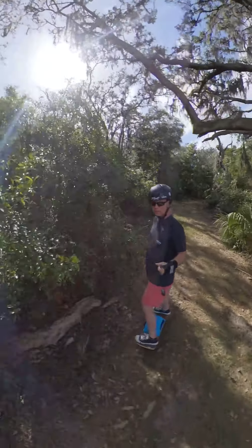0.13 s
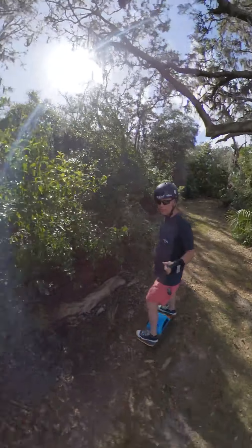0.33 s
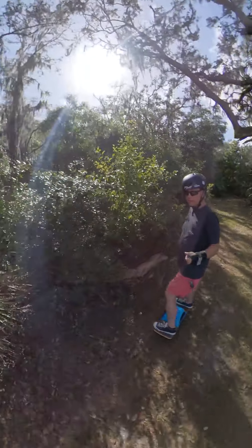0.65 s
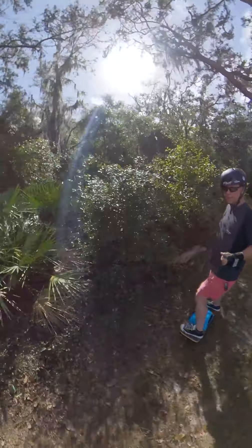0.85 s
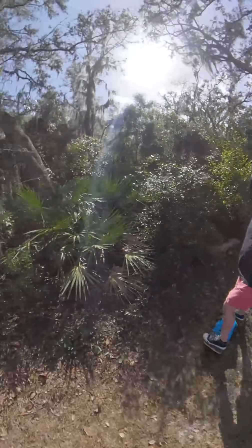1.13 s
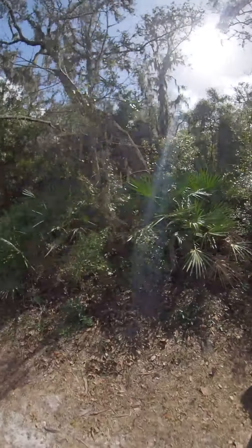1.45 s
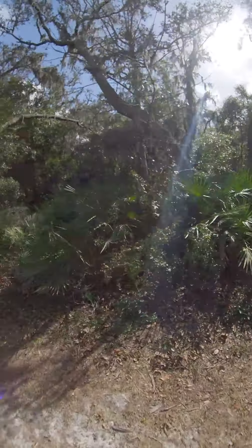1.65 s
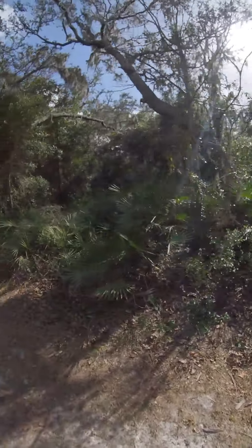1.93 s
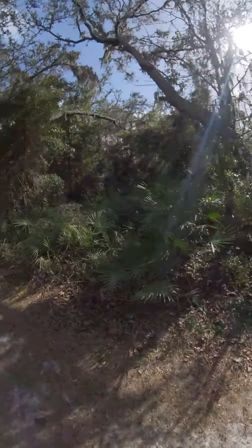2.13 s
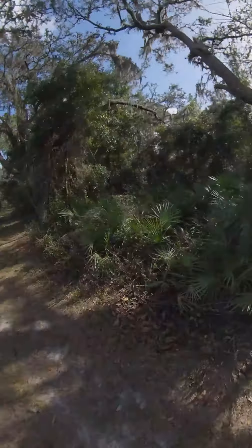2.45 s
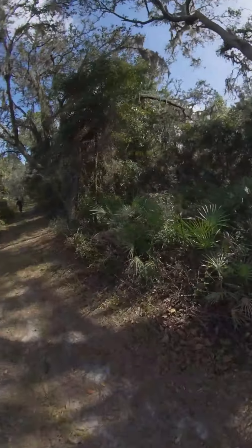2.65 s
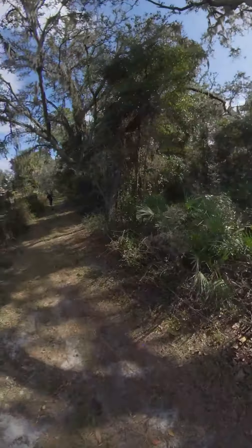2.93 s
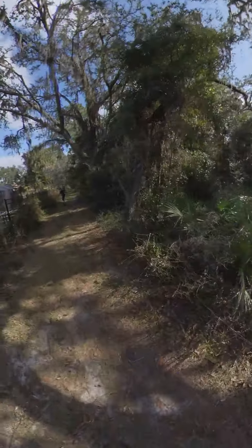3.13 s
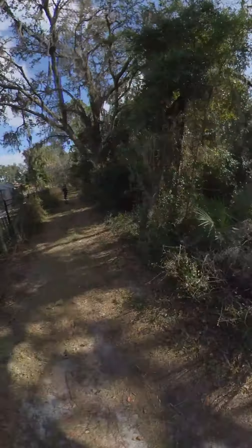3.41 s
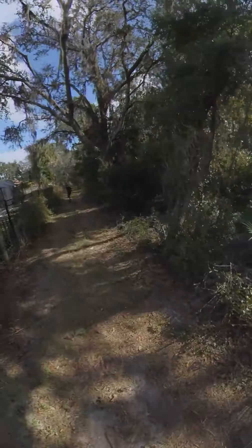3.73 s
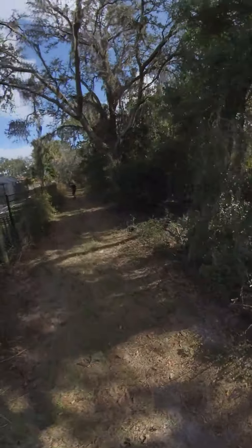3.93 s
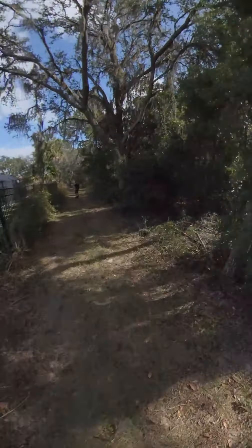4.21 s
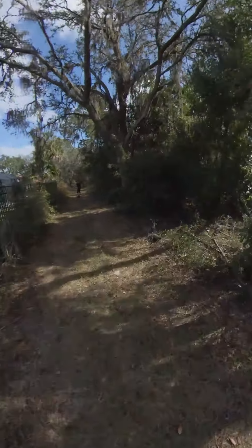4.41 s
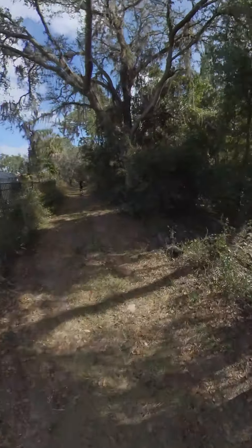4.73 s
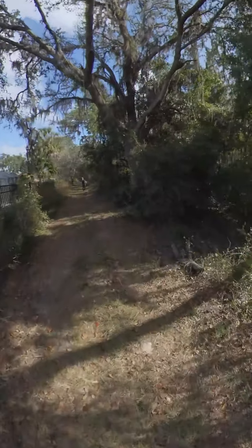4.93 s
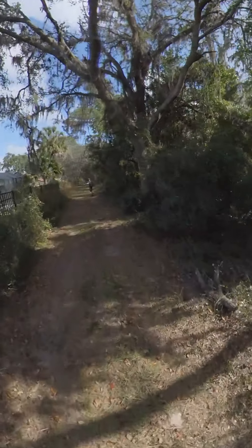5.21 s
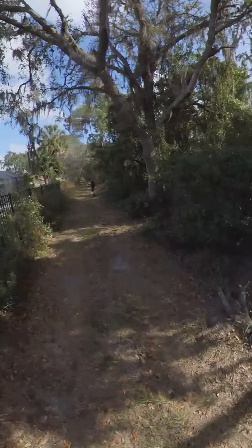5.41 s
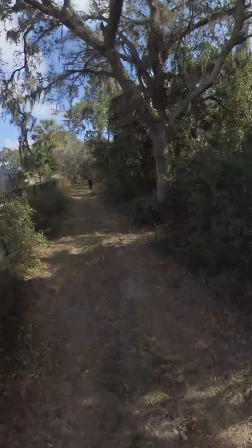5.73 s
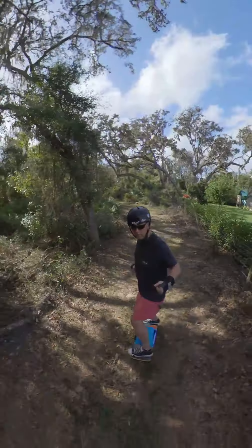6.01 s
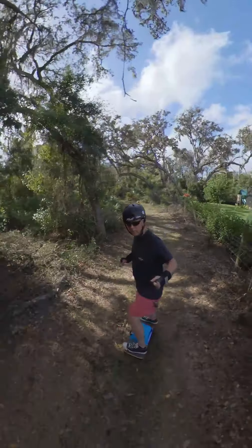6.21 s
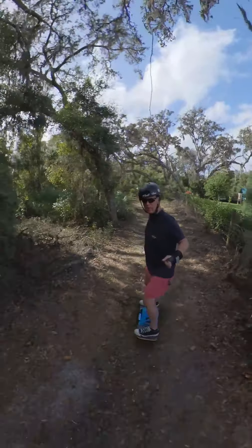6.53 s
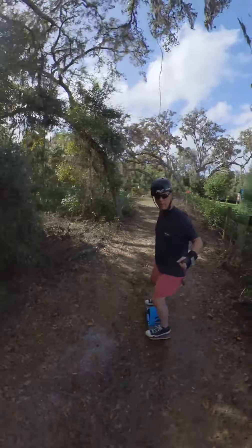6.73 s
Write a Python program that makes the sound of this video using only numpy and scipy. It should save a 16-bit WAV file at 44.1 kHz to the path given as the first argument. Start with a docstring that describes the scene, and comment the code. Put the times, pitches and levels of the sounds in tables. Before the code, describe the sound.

Low rough rolling on dirt, with crisp bursts of dry leaves, sharp twig clicks, dull deck knocks and soft wind buffeting.

```python
"""First comes the low, gritty rolling of a one-wheeled electric board on a dirt trail, over light wind.
A camera on a pole beside it hears the fat tyre crush dry leaves and snap twigs, and roots knock the deck.
Rolling and leaves are built from tiny random breaks; knocks are ringing tones and twigs are short clicks.
Wind is low noise that rises and falls on each port, with short thuds for puffs.
The wheel is nearer the right port."""
import sys
import numpy as np
from scipy import signal
from scipy.fft import rfft, irfft, next_fast_len
from scipy.io import wavfile
from scipy.ndimage import uniform_filter1d, map_coordinates

SR = 44100
rng = np.random.default_rng(int(sys.argv[2]) if len(sys.argv) > 2 else 0)


def digitize_waveform(pressure):
    """Quantize a signal to 16-bit integers and store it at the path in sys.argv[1].

    Rows of a 2-D input are taken as channels; values are limited to [-1, 1].
    """
    field = np.atleast_2d(pressure).T
    bounded = np.clip(field, -1, 1)
    quanta = np.round(bounded * 32767).astype(np.int16)
    wavfile.write(sys.argv[1], SR, quanta)


N = 302506
T = np.arange(N) / SR

# the ground between leaf patches: start_s, rustle_db, rolling_db
TRAIL = [(0.0, -51, -42), (0.5, -48, -42), (1.1, -46, -42), (1.8, -46.5, -41.5), (2.74, -48.5, -42),
         (3.43, -46, -41), (3.77, -47.5, -40.5), (4.6, -43.5, -42), (5.14, -43, -39.5),
         (5.49, -42.5, -42.5), (5.83, -44, -39), (6.17, -45, -40), (6.86, -42, -40)]
# ways the deck and tyre can ring: pitch_hz, level_db, time_to_fall_60_db_s
DECK_MODES = [(299, -1, 0.06), (369, -1.5, 0.044), (470, 5.5, 0.1), (560, 4, 0.06), (687.4, 1, 0.24),
              (830, 12, 0.02), (1047.5, -1.5, 0.42), (1440, -19, 0.047)]
# colour of the tyre on the road: pitch_hz, level_db_per_hz
ROAD_COLOUR = [(150, -56), (300, -3), (600, 1), (1000, 0.5), (1300, -3.5), (1550, -8.5), (2400, -20.5),
               (3500, -19.5), (6000, -102)]
# leaf patches under the tyre: middle_s, level_db, length_s, brightness_db_per_octave,
# common_leaf_pitch_hz, common_leaf_lift_db
LEAF_PATCHES = [(0.091, -42.5, 0.035, 3, 8140, 6.0), (0.221, -43, 0.021, 4, 6900, 4.0),
                (0.69, -40.5, 0.036, 4.5, 1930, 1), (0.81, -41.0, 0.046, 3.5, 1900, 2),
                (0.946, -35.5, 0.034, 2.5, 4300, 1.5), (1.146, -32.0, 0.009, -0.5, 8100, 10),
                (1.2, -29, 0.022, 3.5, 2720, 9.5), (1.305, -36.0, 0.027, -0.5, 2430, 3.0),
                (1.488, -27.5, 0.021, 6, 3330, 18), (1.561, -34, 0.028, 5, 2200, 3.5),
                (1.725, -31.5, 0.021, 2, 3420, 6), (1.782, -36.5, 0.014, 2, 9000, 5),
                (1.988, -38, 0.0098, -6.0, 2000, 1), (2.316, -35, 0.011, -4.5, 5600, 12),
                (2.419, -40, 0.037, -2.5, 8950, 6), (2.509, -28, 0.023, -0.5, 9100, 0.5),
                (2.649, -42, 0.022, -0.5, 7400, 0.5), (2.808, -33.5, 0.025, -2.5, 9000, 3),
                (2.894, -40.5, 0.035, 1, 5360, 5.0), (2.96, -42, 0.046, 6.5, 3550, 5),
                (3.166, -34, 0.011, -9.5, 9000, 17), (3.197, -34.5, 0.014, -5.5, 3200, 8),
                (3.225, -39.5, 0.029, 1, 4570, -3), (3.412, -27, 0.025, 2, 3650, 7.5),
                (3.527, -37, 0.032, 1.5, 4000, 6.5), (3.607, -34, 0.039, 3, 3600, 3.5),
                (3.746, -34, 0.008, -12, 4200, 13), (3.844, -45, 0.016, 12, 1920, 7.5),
                (3.959, -38.5, 0.03, 5, 1870, 12), (4.349, -37.0, 0.0062, -1.5, 4030, 2),
                (4.392, -37, 0.018, 3, 2900, 5), (4.555, -42.5, 0.011, 5.5, 1910, 6),
                (4.681, -44, 0.021, 1, 3100, 7), (4.818, -35.5, 0.013, 4.5, 3140, 12),
                (4.892, -30, 0.0063, 5, 2500, 5), (4.91, -30, 0.012, 3, 2190, 10.5),
                (4.939, -31.5, 0.015, 2.5, 3070, 10), (4.983, -36, 0.03, -2, 5700, 7.0),
                (5.083, -34.5, 0.021, 3, 4500, 3), (5.14, -39.5, 0.029, -9.0, 4700, 9),
                (5.331, -35.5, 0.009, -4.5, 4500, 2), (5.458, -33, 0.005, -2.5, 9000, 3.5),
                (5.477, -37, 0.035, 1, 6500, 1), (5.554, -37.0, 0.017, 6, 6350, 5),
                (5.589, -34.5, 0.034, 0, 3570, 5), (5.676, -35.5, 0.032, 6.5, 1900, 0),
                (5.753, -35, 0.022, 1.5, 6200, 1), (5.853, -34.0, 0.032, 2.5, 4000, 2),
                (5.935, -38, 0.044, 0.5, 6940, -5), (6.148, -36.0, 0.022, -1, 5300, 5),
                (6.266, -40, 0.072, 2.0, 1860, 0), (6.364, -35, 0.013, -21, 2820, 0),
                (6.477, -41, 0.042, 2.5, 4500, 0), (6.524, -32.5, 0.023, 2.5, 2200, 10.5),
                (6.619, -36, 0.021, 3, 4470, -8), (6.693, -38, 0.02, 5, 2600, 6),
                (6.785, -34, 0.032, -1, 7800, 4), (6.837, -35.5, 0.025, 5.0, 1900, 9)]
# colour of the leaf grains: pitch_hz, level_db_per_hz
LEAF_COLOUR = [(700, -0.5), (1500, 2), (2400, 3.5), (3000, -2.5), (3600, -3), (5200, -3), (6500, -3.5),
               (9700, -2.5), (9800, -10)]
# wind on the ports: start_s, strength_db, left_minus_right_db
WIND = [(0.0, -55, 7), (0.4, -57.5, 0), (0.7, -50.5, -5), (1.15, -57.5, 7), (1.65, -41.5, 3),
        (2.15, -53.5, 5), (2.35, -44.5, 10), (2.8, -47, -1), (2.93, -55, -1), (3.08, -40.5, 11),
        (3.3, -51.5, 3), (3.65, -52, -2), (3.8, -46.5, 1), (4.1, -45.5, 5.5), (4.7, -49.5, -2),
        (4.88, -55, 10), (5.12, -43.5, 7), (5.48, -64, -11), (5.72, -45, 9), (6.0, -58.5, -2),
        (6.42, -44, 4), (6.86, -67, 6)]
# colour of the fluttering gusts on the left port: pitch_hz, level_db_per_hz
GUST_COLOUR = [(15, -21), (35, -14), (65, 2.5), (95, 3), (140, 4), (210, 1), (290, -1.5), (380, -7.5),
               (600, -89)]
# colour of the deeper draught: pitch_hz, level_db_per_hz
DRAUGHT_COLOUR = [(15, -9), (32, -3.5), (50, 17), (95, 11.5), (130, 5.5), (250, -11), (500, -63)]
# roots and stones that knock the deck: start_s, level_db, pitch_hz
KNOCKS = [(0.11, -26.5, 650), (0.341, -34, 300), (0.3488, -23.5, 370), (0.47, -22.5, 490),
          (0.515, -35, 400), (0.525, -25, 320), (0.55, -30, 330), (0.646, -23.5, 600), (0.6873, -26.5, 590),
          (0.8161, -22, 634), (0.833, -28, 565), (0.931, -31, 500), (0.951, -25, 790), (1.2083, -23.5, 650),
          (1.213, -23, 500), (1.232, -24, 644), (1.277, -27, 480), (1.292, -25.5, 790),
          (1.7024, -30.5, 714), (1.716, -22.5, 484), (1.7742, -26.5, 526), (2.1016, -20.5, 517),
          (2.192, -29.5, 770), (2.419, -31, 640), (2.5094, -26.5, 730), (2.5304, -26, 630),
          (2.6426, -31, 620), (2.7, -28.5, 830), (2.891, -34, 560), (3.064, -22.5, 500), (3.1581, -19, 850),
          (3.3285, -22, 540), (3.339, -27, 380), (3.421, -24.5, 790), (3.6382, -21, 463), (3.739, -36, 420),
          (4.348, -29.5, 650), (4.394, -25, 700), (4.425, -32, 730), (4.823, -27.5, 580), (4.9, -26, 950),
          (5.1164, -25, 640), (5.725, -31.5, 730), (5.7758, -26.5, 610), (5.888, -29.5, 600),
          (5.938, -24.5, 620), (5.9533, -28.5, 1010), (5.975, -28, 500), (6.077, -30, 800),
          (6.144, -25.5, 740), (6.1594, -29, 620), (6.251, -27.5, 700), (6.29, -32, 620),
          (6.418, -30.5, 630), (6.4512, -30, 724), (6.539, -27, 900), (6.7451, -22.5, 850),
          (6.835, -26, 550)]
# sudden puffs, mostly on one port: start_s, body_level_db, pitch_hz, left_minus_right_db
PUFFS = [(0.335, -46.5, 258, 4), (0.76, -40, 127, -20), (1.354, -38, 149, -21), (1.503, -29, 163, 17),
         (1.577, -32.5, 175, 13), (1.646, -30, 154, 18), (1.701, -34, 159, 24), (1.721, -30.5, 150, 23),
         (1.762, -42, 165, 14), (1.923, -39, 151, 16), (2.009, -41, 122, 13), (2.247, -37, 143, 12),
         (2.299, -28, 210, 18), (2.321, -40, 166, -15), (2.396, -38, 133, -13), (2.432, -36, 157, 16),
         (2.492, -34.5, 118, 21), (2.556, -39.5, 191, -23), (2.644, -34, 98, 17), (2.768, -40, 130, 12),
         (3.015, -24.5, 187, 27), (3.061, -34, 215, 14), (3.095, -31.5, 230, 13), (3.146, -33, 190, 24),
         (3.74, -31, 128, -23), (3.813, -41, 170, 16), (3.871, -35, 151, 22), (3.983, -35, 138, 12),
         (4.118, -39, 187, 16), (4.292, -31.5, 115, 16), (4.342, -36, 135, -14), (4.402, -31, 193, 23),
         (4.447, -42, 126, -3), (4.56, -44, 104, 21), (4.662, -41, 202, 12), (4.692, -40, 168, 13),
         (5.075, -35, 210, 19), (5.132, -43, 107, -19), (5.164, -40, 98, 9), (5.231, -38, 91.5, 16),
         (5.682, -37.5, 140, 11), (5.766, -41, 156, 11), (6.353, -36.5, 140, -18), (6.419, -43, 112, 13)]
# twigs that break: start_s, level_db (before a shared boost), pitch_hz
TWIGS = [(0.368, -34, 2300), (0.533, -31, 2550), (0.7942, -28, 4700), (0.9543, -26, 4700),
         (0.9586, -26, 3700), (1.1443, -23, 4500), (1.19, -25, 3400), (1.2, -19, 3400), (1.2948, -25, 2300),
         (1.302, -28, 2500), (1.3196, -29, 4500), (1.3608, -29, 6000), (1.4894, -15, 3600),
         (1.7173, -21, 3700), (1.988, -31, 2200), (2.3134, -25, 4300), (2.427, -30, 2600),
         (2.437, -31, 2500), (2.5097, -16, 3500), (2.5148, -20, 5200), (2.7979, -21, 2200),
         (2.8067, -25, 2500), (2.887, -30, 5000), (3.1688, -27, 4600), (3.1783, -27, 6400),
         (3.1973, -21, 2550), (3.2174, -28, 4600), (3.411, -21, 3400), (3.4162, -20, 3600),
         (3.527, -28, 3600), (3.5933, -27, 4500), (4.2075, -27, 7900), (4.27, -30, 2100),
         (4.3459, -29, 4200), (4.3843, -29, 3500), (4.542, -27, 8500), (4.6904, -30, 3050),
         (4.8826, -23, 8300), (4.9002, -23, 2800), (4.9402, -24, 3500), (4.9757, -24, 3900),
         (5.0765, -17, 5000), (5.1358, -29, 3500), (5.4549, -27, 2400), (5.4669, -27, 5500),
         (5.5547, -25, 5500), (5.6661, -25, 6700), (5.6734, -15, 7200), (5.7435, -20, 5800),
         (6.1437, -26, 3100), (6.2927, -29, 4700), (6.476, -30, 4500), (6.5234, -21, 2600),
         (6.536, -24, 3200), (6.6085, -21, 4200), (6.6149, -24, 7800), (6.6915, -21, 6800),
         (6.7621, -25, 2700), (6.7844, -25, 5800)]
# rough likeness of the wheel's sound at the two ports: pitch_hz, likeness_0_to_1
PORT_LIKENESS = [(250, .6), (650, .68), (1100, .3), (1700, .62), (3500, .42), (4900, .05), (6300, .55),
                 (8000, .32), (9500, .33)]
# port balance before each side's own scaling: pitch_hz, left_minus_right_db
PORT_BALANCE = [(300, -1.5), (1500, -1.5), (3000, -2.5), (4500, -4), (9500, -4)]
# middle pitches of the leaf sizes, big leaves first
LEAF_SIZES_HZ = np.geomspace(1650, 9000, num=9)

RUTS_DB = 1  # unevenness of the rolling
RISE_SHARE = 0.52  # part of a patch's length spent swelling
FOCUS_DB = 1  # loss per squared octave away from the middling leaves
COMMON_OCTAVES = 0.14  # how widely the commonest leaves spread in pitch
EDDY_DB, EDDIES_PER_S = 0.5, 7  # quick lulls and swells, each port its own
PUFF_RISE_S, PUFF_PUNCH_DB = 0.011, 4  # a puff peaks this soon, this far over its body
TWIG_BOOST_DB = 5
BASE_LAG_MS = 0.31  # left port's lag, before each side's own scaling
SHADOW_HZ = 5335  # the lag vanishes from here up
TOP_HZ = 11117  # the camera's band limit


def amp(db):
    """Turn decibels into a gain."""
    return 10 ** (np.asarray(db) / 20)


def unit(x):
    """Scale a sound to an average (rms) strength of 1."""
    return x / np.sqrt(np.mean(x ** 2) + 1e-20)


def along(points, hz):
    """Read a value between (pitch, value) points, on a log pitch axis."""
    f, v = np.transpose(points)
    return np.interp(np.log(hz + 1), np.log(f + 1), v)


def curves(rows):
    """Draw each column after the time as a line with one value per sample."""
    s, *columns = np.transpose(rows)
    return [np.interp(T, s, column) for column in columns]


def wobble(rate):
    """Make a smooth random curve with this many random points a second."""
    knots = rng.standard_normal(int(N * rate / SR) + 4)
    return map_coordinates(knots, [T * rate])


def filtered(x, response):
    """Multiply each pitch in a sound by a response, which may also shift its timing."""
    size = next_fast_len(N + 8192)
    hz = np.fft.rfftfreq(size, 1 / SR)
    return irfft(rfft(x, size) * response(hz), size)[..., :N]


def coloured(x, spectrum):
    """Shape a sound by (pitch, dB) points, then scale it to rms 1."""
    return unit(filtered(x, lambda hz: amp(along(spectrum, hz))))


def add_at(out, start_s, sound):
    """Add a short sound to a longer one at a given time."""
    out[:, round(start_s * SR):][:, :sound.shape[-1]] += sound


def crackle(pitches_hz, per_s, cycles, spread_db, smooth, patchy_db):
    """Two streams of tiny breaks, each ringing briefly, over a hiss in shared patches of random colour."""
    mix = smooth * np.sqrt(len(pitches_hz)) * rng.standard_normal((2, N))
    for hz in pitches_hz:
        when, size = rng.random((2, N))
        strength = amp(spread_db * np.minimum(-np.log(size + 1e-9), 3.5))
        breaks = (when < per_s / SR) * strength * rng.standard_normal((2, N))
        b, a = signal.iirpeak(hz, cycles, SR)
        ringing = unit(signal.lfilter(b, a, breaks))
        mix += ringing * np.sqrt(hz / np.mean(pitches_hz))
    # random patches in pitch and time, alike in both streams
    pieces = signal.stft(mix, nperseg=512)[2]
    patches = uniform_filter1d(rng.standard_normal(pieces.shape[1:]), size=2, axis=0)
    patches = uniform_filter1d(patches, size=5, axis=1)
    return signal.istft(pieces * amp(patchy_db * unit(patches)), nperseg=512)[1][:, :N]


def deck_ringing(t, bend):
    """Each way the deck can ring is a fading tone; bend multiplies its pitch."""
    hz, level_db, t60 = (column[:, None] for column in np.transpose(DECK_MODES))
    return amp(level_db - 60 * t / t60) * np.sin(2 * np.pi * hz * bend * t)


def rolling():
    """Grit shakes the deck without pause and adds the tyre's own road noise."""
    t = np.arange(SR // 8) / SR
    grit = crackle([500, 1100, 2200], per_s=400, cycles=0.72, spread_db=-0.5, smooth=1.75, patchy_db=2.5)
    ringing = deck_ringing(t, 0.93).sum(0)[None]
    shaken = unit(signal.fftconvolve(grit, ringing, axes=1)[:, :N])
    mix = 0.38 * shaken + 1.22 * coloured(grit, ROAD_COLOUR)
    level_db = curves(TRAIL)[1] + RUTS_DB * wobble(10)
    return amp(level_db) * unit(mix)


def leaves():
    """Patches swell and fade as the tyre rolls over; big leaves crunch low, small ones hiss high."""
    octaves = np.log2(LEAF_SIZES_HZ)[:, None]
    above = octaves - octaves.mean()
    shared = wobble(18)
    stir_db = 2.94 * shared + 0.99 * np.array([wobble(12) for _ in LEAF_SIZES_HZ])
    power = amp(curves(TRAIL)[0] + stir_db) ** 2
    for s, db, length, bright_db, common_hz, lift_db in LEAF_PATCHES:
        near = slice(max(round((s - 0.12) * SR), 0), round((s + 0.13) * SR))
        from_middle = T[near] - s
        side_share = np.where(from_middle < 0, RISE_SHARE, 1 - RISE_SHARE)
        u = from_middle / side_share / length
        # power is half the peak at u = -1 and u = 1
        swell = 0.5 ** (np.abs(u) ** np.where(u < 0, 2.4, 1.4))
        off_common = (octaves - np.log2(common_hz)) / COMMON_OCTAVES
        common_db = lift_db * np.exp(-0.5 * off_common ** 2)
        colour = amp(bright_db * above - FOCUS_DB * above ** 2 + common_db) ** 2
        power[:, near] += amp(db) ** 2 * colour / colour.mean() * swell
    flakes = crackle(np.geomspace(1600, 9300, num=8), per_s=350, cycles=1.97,
                     spread_db=3, smooth=1.86, patchy_db=4.0)
    grains = coloured(flakes, LEAF_COLOUR)

    def band(k):
        # overlapping bands, one for each leaf size, that add up to the whole
        chosen = np.arange(len(octaves)) == k
        return lambda hz: np.interp(np.log2(hz + 1), octaves[:, 0], chosen)

    rustle = sum(np.sqrt(p) * filtered(grains, band(k)) for k, p in enumerate(power))
    return filtered(rustle, lambda hz: hz < 9780)


def gusts():
    """Gusts flutter over a deeper draught that partly follows them; each port has its own noise."""
    strength_db, lean_db = curves(WIND)
    eddies_db = [EDDY_DB * wobble(EDDIES_PER_S) for _ in range(2)]
    ports_db = strength_db + np.array([lean_db / 2 + eddies_db[0], -lean_db / 2 + eddies_db[1]])
    # the right port flutters at a lower pitch
    colours = [GUST_COLOUR, [(0.72 * hz, db) for hz, db in GUST_COLOUR]]
    flutter = []
    for colour in colours:
        lumps = amp(2.6 * wobble(22))
        flutter.append(unit(lumps * coloured(rng.standard_normal(N), colour)))
    draught = coloured(rng.standard_normal((2, N)), DRAUGHT_COLOUR)
    draught_db = -56.0 + 0.39 * (ports_db + 42.0)
    return amp(ports_db) * np.array(flutter) + amp(draught_db) * draught


def knocks():
    """A knock rings the deck's tones, those nearest its own pitch the most."""
    out, t = np.zeros((2, N + SR)), np.arange(SR // 8) / SR
    mode_hz = np.transpose(DECK_MODES)[0][:, None]
    for s, db, pitch in KNOCKS:
        chance = rng.standard_normal((2, len(DECK_MODES), 1))
        lean = amp(-11.5 * np.log2(mode_hz / pitch) ** 2 + 2.1 * chance[0])
        # the rider's shifting weight detunes the deck a little from blow to blow
        ring = (lean * deck_ringing(t, 1 + 0.04 * chance[1])).sum(0)
        ring *= 1 - np.exp(-t / 0.0011)  # soft start
        ring *= amp(-60 * t / 0.1)  # the feet on the deck damp the blow quickly
        # direct stream only
        add_at(out, s, amp(db) * ring / np.abs(ring).max() * [[1], [0]])
    return out[:, :N]


def puffs():
    """A puff is a soft low thud, turned down on the port it mostly misses."""
    out, t = np.zeros((2, N + SR)), np.arange(SR // 5) / SR
    body = (t / PUFF_RISE_S * np.exp(1 - t / PUFF_RISE_S)) ** 3
    for s, db, hz, pan_db in PUFFS:
        # the pitch sags as the puff spreads
        thud = np.sin(2 * np.pi * hz * t * (1.1 - 4 * t)) * body
        quieter_db = np.minimum([[pan_db], [-pan_db]], 0)
        add_at(out, s, amp(db + PUFF_PUNCH_DB + quieter_db) * thud)
    return out[:, :N]


def twigs():
    """A break is a quickly fading click at the twig's pitch with a short splintering tail."""
    out, t = np.zeros((2, N + SR)), np.arange(SR // 40) / SR
    for s, db, hz in TWIGS:
        click = np.sin(2 * np.pi * hz * t) * amp(-60 * t / 0.003)
        splinters = 0.25 * rng.standard_normal((2, len(t))) * amp(-60 * t / 0.016)
        # the splinters ring near the twig's own pitch
        splinters = 1.8 * signal.lfilter(*signal.iirpeak(hz, 2.5, SR), splinters)
        add_at(out, s - 0.0002, amp(db + TWIG_BOOST_DB) * (click * [[1], [0]] + splinters))

    def thin(hz):
        # fades below 1200 Hz and stops steeply above 10200 Hz
        low = (hz / 1200) ** 2
        return low / (1 + low) / (1 + (hz / 10200) ** 30)

    return filtered(out[:, :N], thin)


def ports(pair):
    """A direct and a scattered stream reach both ports; below the body's shadow the left hears late."""
    def heard(side):
        def response(hz):
            turn = np.arccos(np.clip(along(PORT_LIKENESS, hz), 0, 1)) / 2
            lag_s = side * BASE_LAG_MS / 1000 / 2 * (hz < SHADOW_HZ)
            late = np.exp(-2j * np.pi * hz * lag_s)
            gain = amp(side * along(PORT_BALANCE, hz) / 2)
            return gain * late * [np.cos(turn), side * np.sin(turn)]
        return filtered(pair, response).sum(0)
    # left is positive, right negative
    return np.array([heard(0.98), heard(-0.86)])


def scene():
    """The wheel's sounds share one direction; the wind does not."""
    wheel = rolling() + leaves() + knocks() + twigs()
    wind = gusts() + puffs()
    return ports(wheel) + wind


def record(dry):
    """The camera keeps nothing above its band limit."""
    return filtered(dry, lambda hz: hz < TOP_HZ)


dry = scene()
out = record(dry)
digitize_waveform(out)
```